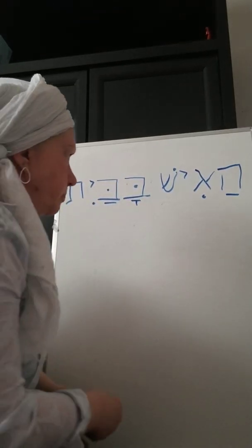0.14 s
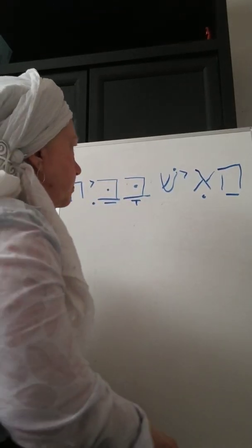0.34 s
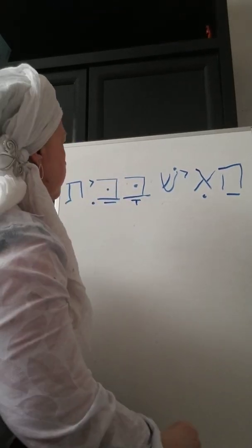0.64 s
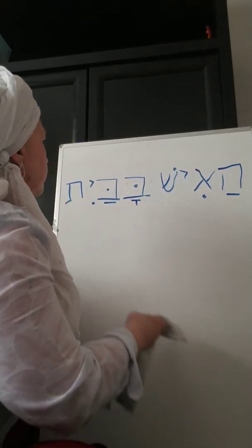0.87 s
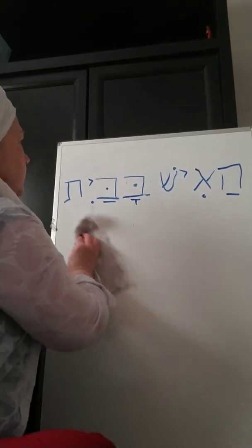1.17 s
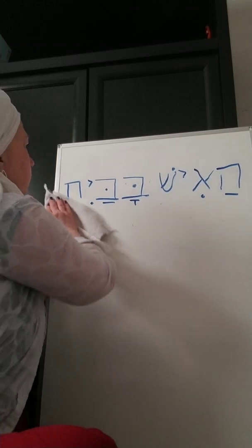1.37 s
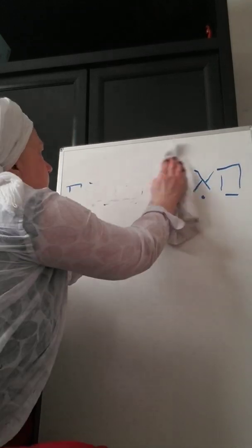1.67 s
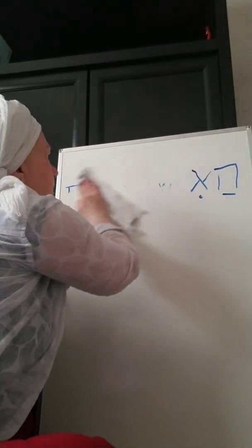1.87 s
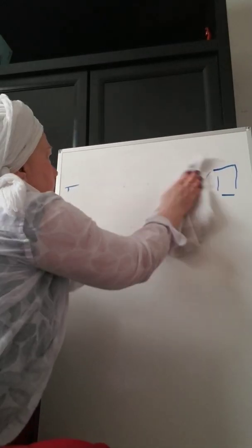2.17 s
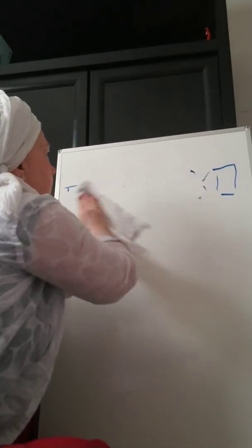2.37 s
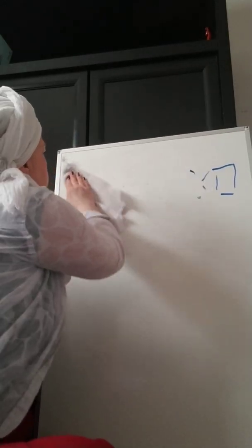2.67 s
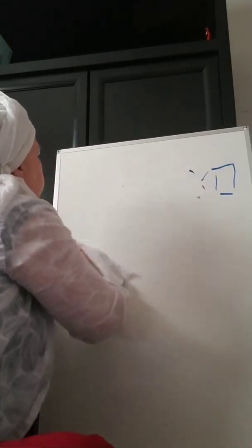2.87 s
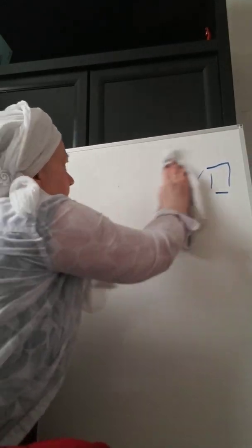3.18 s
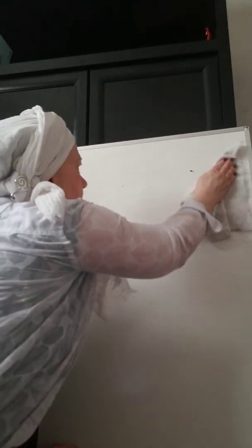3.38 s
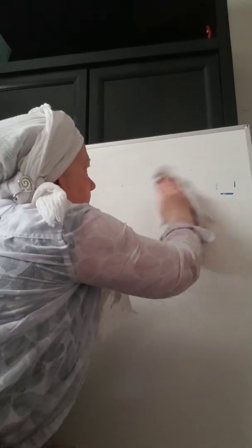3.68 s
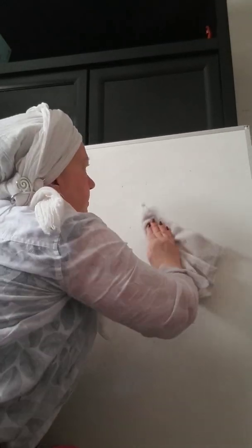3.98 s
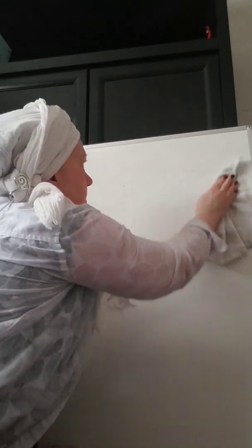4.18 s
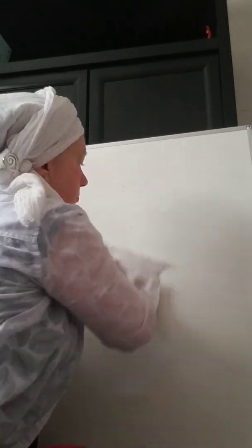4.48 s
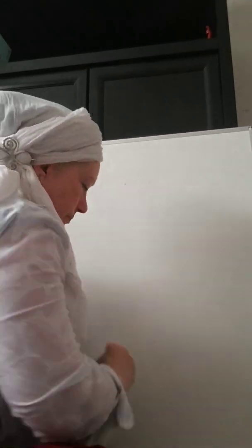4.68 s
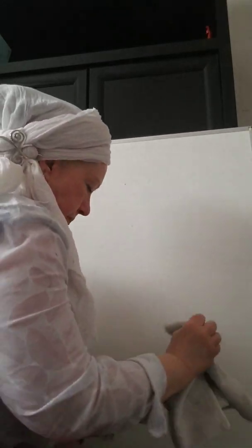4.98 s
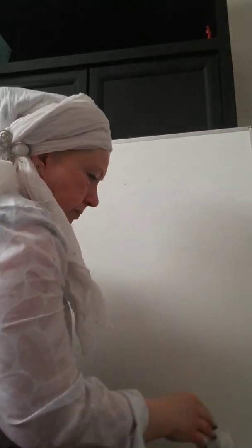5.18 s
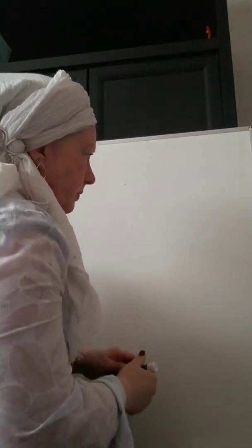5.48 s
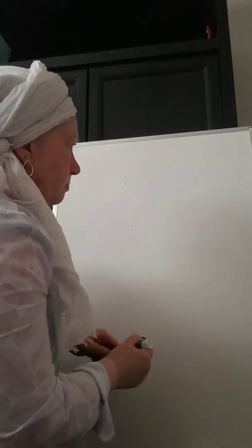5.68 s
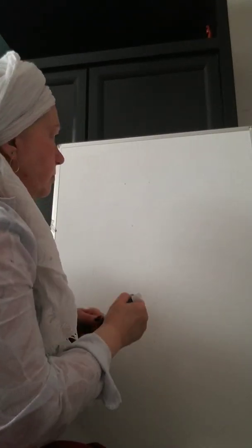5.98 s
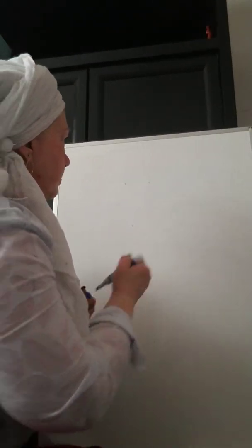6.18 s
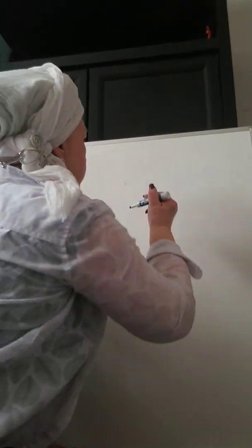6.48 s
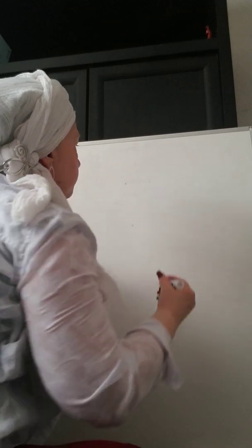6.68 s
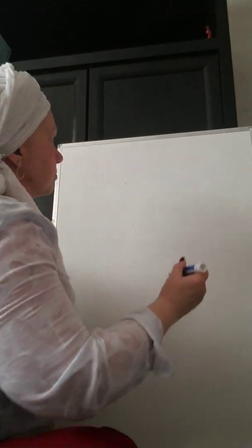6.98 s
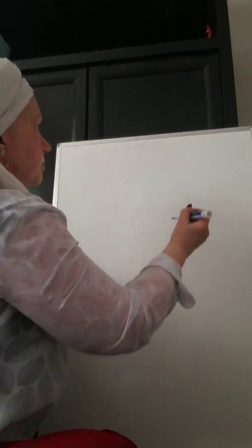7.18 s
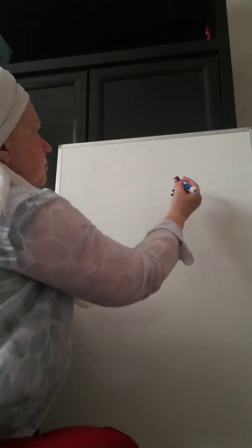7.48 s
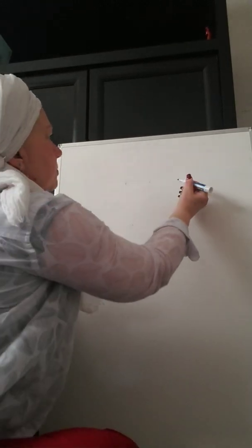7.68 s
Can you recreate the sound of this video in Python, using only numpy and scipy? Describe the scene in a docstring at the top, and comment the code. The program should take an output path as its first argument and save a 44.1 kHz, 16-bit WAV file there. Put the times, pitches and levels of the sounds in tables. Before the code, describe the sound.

In a small, quiet room, a soft thump leads into brisk, hissing cloth strokes on a whiteboard, which gives hollow knocks, thuds and rattles as it is pushed. The wiping stops a little past halfway. A marker clicks as it is picked up and uncapped, a sleeve rustles softly, and the tip makes three short strokes with light taps, over faint room rumble and hiss.

```python
"""A cloth wipes a loose whiteboard to and fro in a small room: its fibres hiss, its drag makes the panel
murmur, and the board bumps, rings and rattles against the cupboard behind it.
Then a marker is picked up and uncapped, a sleeve rustles, and the felt tip taps and slides on the board.
A low room rumble and a faint hiss lie under everything."""
import sys
import numpy as np
from scipy import signal
from scipy.fft import rfft, irfft, next_fast_len
from scipy.io import wavfile
from scipy.ndimage import map_coordinates

SR = 44100
rng = np.random.default_rng(int(sys.argv[2]) if len(sys.argv) > 2 else 0)


def transcribe(u):
    """Save the signal u as a 16-bit wav file named by the first command-line argument.

    u: samples, shape (n,) or (channels, n), limited to [-1, 1]; the rate is SR.
    q: integer samples, one column per channel.
    """
    v = np.clip(np.atleast_2d(u).T, -1, 1)
    q = np.round(v * 32767).astype(np.int16)
    wavfile.write(sys.argv[1], SR, q)


N = 346135
TOP_HZ = 15600


def amp(db):
    """Decibels to gain."""
    return 10 ** (np.asarray(db) / 20)


def unit(x):
    """Scale to rms 1."""
    return x / np.sqrt(np.mean(x ** 2) + 1e-20)


def along(points, hz):
    """Interpolate (freq_hz, value) points on a log axis."""
    freqs_hz, values = np.transpose(points)
    return np.interp(np.log(hz + 1), np.log(freqs_hz + 1), values)


def wobble(rate_hz):
    """Smooth random curve, rate_hz knots a second."""
    knots = rng.standard_normal(int(N * rate_hz / SR) + 4)
    return map_coordinates(knots, [np.arange(N) * rate_hz / SR])


def filtered(x, response):
    """Apply a frequency response."""
    n = x.shape[-1]
    padded = next_fast_len(n + 4096)
    return irfft(rfft(x, padded) * response(np.fft.rfftfreq(padded, 1 / SR)), padded)[..., :n]


def rise(t, tau_s):
    """Exponential attack."""
    return 1 - np.exp(-t / tau_s)


def fade(t, t60_s):
    """Exponential decay, 60 dB in t60_s."""
    return np.exp(-np.log(1000) * t / t60_s)


def damped(x, t60_curve):
    """Decay each frequency at its own rate."""
    hz, t, bins = signal.stft(x, SR, nperseg=256)
    decay = fade(t, along(t60_curve, hz)[:, None])
    return signal.istft(bins * decay, SR, nperseg=256)[1][:, :x.shape[1]]


def add(track, start_s, sound):
    """Mix a sound into the track."""
    part = track[:, max(round(start_s * SR), 0):][:, :sound.shape[1]]
    part += sound[:, :part.shape[1]]


def ring(modes, t, detune=0.004):
    """Damped modes; balance, tuning and phase vary from blow to blow."""
    weights = np.array([amp(db + 2 * rng.normal()) for _, db, _ in modes])
    waves = [fade(t, t60_s) * np.sin(2 * np.pi * (hz * (1 + detune * rng.normal()) * t + rng.random()))
             for hz, _, t60_s in modes]
    return np.sqrt(2) * weights @ np.array(waves) / np.linalg.norm(weights)


# Left-right likeness: freq_hz, correlation
COHERENCE = [(100, 0.9), (600, 0.73), (1200, 0.54), (2500, 0.1), (14000, 0.36)]

def noise(spectrum, size):
    """Coloured stereo noise, rms 1; the channels are most alike in the bass."""
    def colour(hz):
        angle = np.arccos(np.clip(along(COHERENCE, hz), -1, 1)) / 2
        lowpass = 1 / (1 + (hz / spectrum[-1][0] / 2) ** 4)
        highpass = 1 / (1 + (spectrum[0][0] / 2 / (hz + 1)) ** 4)
        return lowpass * highpass * amp(along(spectrum, hz)) * [np.cos(angle), np.sin(angle)]
    mid, side = filtered(rng.standard_normal((2, size)), colour)
    return unit(np.array([mid + side, mid - side]))


# Room background spectra: freq_hz, gain_db
RUMBLE = [(20, -20), (32, -8), (50, 3.5), (72, -10.5), (102, -4.5), (125, -20), (170, -26), (400, -36.5)]
HISS = [(600, -9), (1500, -12), (5000, -11), (9000, -15), (11300, -13), (12500, -6), (15800, -12)]

def room_tone():
    """Wavering low rumble and thin steady hiss."""
    rumble = unit(noise(RUMBLE, N) * amp(1.3 * wobble(5.7)))
    return amp(-57.5) * rumble + amp(-70.5) * noise(HISS, N)


# Modes of panel bending, hollow body, sheet and metal edging: pitch_hz, gain_db, t60_s
PANEL_MODES = [(45, 0.5, 0.37), (49.9, 5, 0.5), (64.7, -3.5, 0.69), (96.4, 5.5, 0.27), (105.1, 2.5, 0.26),
               (120.8, -2, 0.44), (146.7, -4, 0.57)]
HOLLOW_MODES = [(228, 0, .42), (253, 1, .42), (318, 4.5, 0.2), (354.3, -2.5, 0.42), (401.6, 7, 0.22),
                (446, -6, 0.5), (510, -4, 0.45), (606, -6, 0.47), (723, -3, 0.4), (820, -6, 0.3)]
SHEET_MODES = [(970, -2, .33), (1066, 0, .33), (1234, 1, .33), (1345, -1, .3), (1432, -3, .3),
               (1534, -7, .28), (1786, -8, .28)]
FRAME_MODES = [(6640, 5, .3), (7080, 1.5, 0.25)]
# Dense-mode spectra of body, sheet and frame: freq_hz, gain_db
KNOCK = [(140, -7), (190, -4.5), (245, -4.5), (290, -9), (360, -8.5), (480, -5), (650, -11), (850, -9),
         (1300, -18.5), (2500, -66.5)]
RATTLE = [(500, -19.5), (750, -14.5), (1300, -7), (1650, -9.5), (2100, -16.5), (2700, -16.5), (3600, -25),
          (6000, -27.5)]
CLACK = [(1500, -45), (2600, -19), (3800, 0.5), (5600, 6), (6700, 20), (8000, -2), (10000, -14),
         (15500, -15.5)]
# Board decay: freq_hz, t60_s
BOARD_T60 = [(150, 0.49), (400, 0.38), (1000, 0.36), (3000, 0.38), (12000, 0.22)]

def contact(knock_db, thud_db, rattle_db, clack_db):
    """A contact thuds and knocks; a hard one also rattles the sheet and clacks the frame."""
    t = np.arange(int(SR * 0.7)) / SR
    thud = amp(thud_db - 8.5) * ring(PANEL_MODES, t) * rise(t, 0.0022)
    body = (damped(noise(KNOCK, len(t)), BOARD_T60) + 0.95 * ring(HOLLOW_MODES, t)) * rise(t, 0.0019)
    cutoff_hz = 1500 * amp((rattle_db - knock_db) / 2)  # a soft push is too slow for the high modes
    body = filtered(body, lambda hz: 1 / (1 + 1j * hz / cutoff_hz) ** 2)
    knock = amp(knock_db - 13) * body * (1 + 0.66 * fade(t, 0.16))
    sheet_ring = np.array([ring(SHEET_MODES, t), ring(SHEET_MODES, t)])
    sheet = damped(noise(RATTLE, len(t)), BOARD_T60) + 0.6 * sheet_ring
    rattle = amp(rattle_db - 19.5) * sheet * (1 + 2.2 * fade(t, 0.1))
    frame = noise(CLACK, len(t)) + 0.76 * ring(FRAME_MODES, t)
    clack = amp(clack_db - 11) * frame * (fade(t, 0.05) + amp(-11.5) * fade(t, 0.5))  # direct + room
    return thud + knock + rattle + clack


def boom(pitch_hz):
    """The hollow behind the panel booms briefly; pitch depends on where the hand presses."""
    t = np.arange(SR // 2) / SR
    return np.tile(fade(t, 0.16) * rise(t, 0.004) * np.sin(2 * np.pi * pitch_hz * t), (2, 1))


# Cloth fetched and put down: start_s, force_db
THUMPS = [(0.353,-36.5), (0.382,-30), (5.061,-30)]
# Single bumps: start_s, force_db, hardness_db
BUMPS = [(0.985,-43.5,-5), (1.055,-44,-6.5), (1.199,-39,-12.5), (1.296,-48.5,2.5), (1.419,-25.5,-6),
         (1.762,-27.5,-20.5), (2.153,-39,-10), (2.239,-29.5,-25), (3.858,-18.5,-7), (3.993,-25,-9),
         (4.216,-32,-21), (4.384,-22,-17.5), (7.804,-47.5,2)]
# Hard shoves: start_s, force_db, hardness_db, swing_db, touch_db, landing_delay_s, boom_hz
SLAMS = [(1.494,-21,-7.5,1,3,0.014,371), (2.986,-30.5,-10.5,2.5,4,0.016,233),
         (3.391,-30,-12,2.5,-1,0.023,410), (3.91,-20.5,-2.5,5.5,3,0.014,513),
         (4.29,-19,-3,1.5,0.5,.010,391)]
# Touch, landing and rebound of a slam, relative to force: knock_db, thud_db, rattle_db, clack_db
SLAM_STAGES = [(-2, -15.5, -4.5, -11.5), (3.5, 1, 1.5, -11.5), (-4.5, 0, -6.5, -31.5)]

def thumps_and_bumps(rebound_s=0.042):
    """The cloth thumps softly when fetched and put down; the board bumps and slams on the cupboard."""
    # Vectors: knock, thud, rattle, clack
    hardness_slope, swing_slope = np.array([0, 0, 1, 1.47]), np.array([0, 1, 0, 0])
    bump_db, thump_db = np.array([3.1, 2.6, 3.8, 1]), np.array([15.5, -7.5, -42, -26])
    out = np.zeros((2, N))
    for start_s, force_db, hardness_db in BUMPS:
        add(out, start_s, contact(*(force_db + hardness_db * hardness_slope + bump_db)))
    for start_s, force_db, hardness_db, swing_db, touch_db, landing_delay_s, boom_hz in SLAMS:
        add(out, start_s + landing_delay_s, amp(force_db - 3) * boom(boom_hz))
        slam_db = force_db + hardness_db * hardness_slope + swing_db * swing_slope
        delays_s = (0, landing_delay_s, landing_delay_s + rebound_s)
        for delay_s, extra_db, stage_db in zip(delays_s, (touch_db, 0, 0), SLAM_STAGES):
            add(out, start_s + delay_s, contact(*(slam_db + extra_db + stage_db)))
    for start_s, force_db in THUMPS:
        add(out, start_s, contact(*(force_db + thump_db)))
    return out


# Spectra of contact snap, hollow barrel tick and board tap: freq_hz, gain_db
SNAP = [(1760, -25.5), (3000, -11.5), (4020, -3.5), (4910, -1.5), (6580, 2.5), (7610, -4), (9580, 2.5),
        (11200, -1), (12600, 0), (15800, -9.5)]
TICK = [(400, -13), (680, 1.5), (1050, -32), (1550, -0.5), (2000, 1), (2650, 1.5), (3600, -6), (6000, -35)]
TAP = [(70, -1), (150, -2), (350, -6), (650, -11), (1100, -17), (2000, -44)]
# Room decay: freq_hz, t60_s
ROOM_T60 = [(200, 0.3), (1500, 0.65), (6000, 0.38), (14000, 0.41)]

def click(snap_db, tick_db, tap_db, cutoff_hz=TOP_HZ):
    """A hard contact snaps and ticks; the room echoes and the board answers."""
    t = np.arange(SR // 2) / SR
    snap = amp(snap_db) * filtered(noise(SNAP, len(t)), lambda hz: 1 / (1 + (hz / cutoff_hz) ** 8))
    tick = amp(tick_db + 7) * noise(TICK, len(t))
    echo = damped(amp(-5.5) * snap + amp(-7) * tick, ROOM_T60) * rise(t, 0.0031)
    tap = amp(tap_db - 9) * damped(noise(TAP, len(t)), BOARD_T60)
    return snap * rise(t, 0.0008) * fade(t, 0.022) + tick * fade(t, 0.025) + echo + tap


# Near-wall echo decay: freq_hz, t60_s
WALL_T60 = [(500, .22), (3000, .22), (10000, .2)]

def ping(modes, level_db, echo_db):
    """A small hard part rings briefly and the nearest walls answer."""
    t = np.arange(SR // 2) / SR
    direct = amp(level_db) * ring(modes, t)
    walls = damped(rng.standard_normal((2, len(t))), WALL_T60) * rise(t, 0.0043)
    echo = signal.fftconvolve(direct[None], walls / np.linalg.norm(walls[0]), axes=1)[:, :len(t)]
    return direct + amp(echo_db) * echo


# Fingernail and marker clicks: start_s, snap_db, tick_db, tap_db, cutoff_hz
CLICKS = [(0.953,-54,-74,-53.5,14100), (1.057,-50,-61,-60,11800), (2.153,-63,-65,-45,11000),
          (4.995,-40,-58.5,-48,15100), (5.448,-52,-94,-86,9230), (6.457,-49,-77,-52,11200),
          (7.799,-37,-56.5,-43.5,10300), (7.806,-35.5,-54,-45,11200)]
# Modes of nail on board, marker pickup, cap and thin plastic wall: pitch_hz, gain_db, t60_s
NAIL_MODES = [(480, 0, .012), (950, 2, .01), (1550, 2, 0.012), (2300, -5, .005)]
PICKUP_MODES = [(640, 0, .07)]
CAP_MODES = [(420, -16, .02), (700, -13, .014), (1560, -3, .007), (2700, 3, .005), (4400, -1, .003),
             (6600, 0, .0015), (11000, 0, .002)]
PLASTIC_MODES = [(8700, -6, .004), (9700, 0, .009)]

def handling():
    """Light clicks; a nail knocks through the cloth, the marker is lifted, its cap pops and ticks."""
    out = np.zeros((2, N))
    for start_s, *settings in CLICKS:
        add(out, start_s, click(*settings))
    nail = ping(NAIL_MODES, level_db=-33.5, echo_db=-3)
    add(out, 4.139, filtered(nail, lambda hz: 1 / (1 + (hz / 3000) ** 4)))
    add(out, 4.995, ping(PICKUP_MODES, level_db=-57, echo_db=2))
    add(out, 6.120, ping(CAP_MODES, level_db=-35, echo_db=2))
    add(out, 6.210, ping(PLASTIC_MODES, level_db=-46, echo_db=-6))
    return out


def strokes(rows, swell, linger_s=0.0073, crests=None):
    """Stroke envelope: the hand speeds up to a crest and slows; the sound lingers briefly."""
    t, power = np.arange(N) / SR, np.zeros(N)
    for k, (start_s, end_s, level_db) in enumerate(rows):
        crest = 0.5 if crests is None else np.clip(crests[k], 0.1, 0.9)
        progress = np.interp(t, [start_s, start_s + crest * (end_s - start_s), end_s], [0, 0.5, 1])
        power += amp(2 * level_db) * np.abs(np.sin(np.pi * progress)) ** (2 * swell)
    pole = np.exp(-1 / (linger_s * SR))
    return np.sqrt(signal.lfilter([1 - pole], [1, -pole], power))


# Spectra of cloth fibres and dragged panel: freq_hz, gain_db
CLOTH = [(700, -38), (1500, -6), (2000, -5.5), (2800, -4.5), (4500, -4), (6200, -3.5), (7400, -2),
         (8800, -7), (10200, -3.5), (11500, -9.5), (12600, -5.5), (14000, -12.5), (15500, -9)]
DRAG = [(30, -13), (50, 5), (75, -6.5), (110, 1.5), (170, -15), (260, -18), (500, -29), (900, -35)]
# Hand sweeps, to and fro: start_s, end_s, hiss_db, drag_db, crest_fraction
SWEEPS = [(0.957,1.19,-57,-49.5,0.41), (1.177,1.395,-55,-53,0.26), (1.342,1.686,-52.5,-49,0.67),
          (1.671,1.91,-52,-42.5,0.37), (1.89,2.16,-52.5,-54,0.68), (2.152,2.404,-52.5,-50,0.34),
          (2.37,2.57,-57,-56.5,0.47), (2.556,2.821,-54.5,-62,0.63), (2.818,3.299,-52.5,-49.5,0.68),
          (3.282,3.501,-51.5,-51,0.66), (3.509,3.806,-53,-48.5,0.41), (3.739,3.933,-50,-45.5,0.76),
          (3.958,4.211,-53,-61,0.15), (4.142,4.65,-53.5,-37.5,0.26)]

def wiping():
    """Fibres hiss over the gloss, brighter when the hand is fast; their drag makes the panel murmur."""
    start_s, end_s, hiss_db, drag_db, crests = np.transpose(SWEEPS)
    hiss_env = strokes(zip(start_s, end_s, hiss_db), swell=0.83, linger_s=0.02, crests=crests)
    drag_env = strokes(zip(start_s, end_s, drag_db), swell=0.55, linger_s=0.025, crests=crests)
    fibres = noise(CLOTH, N) * amp(0.8 * wobble(57) + wobble(530))
    treble = filtered(fibres, lambda hz: hz ** 2 / (hz ** 2 + 6000 ** 2))
    hiss = hiss_env * unit(fibres + 3.43 * hiss_env / hiss_env.max() * treble)
    grip = amp(2.5 * wobble(25))  # the cloth catches and lets go
    return hiss + grip * drag_env * noise(DRAG, N)


# Sleeve slips: start_s, end_s, level_db
SLIPS = [(5.03, 5.24, -86), (6.44, 6.63, -53), (6.70, 6.87, -64.5), (7.0, 7.24, -74)]
# Sleeve spectrum: freq_hz, gain_db
FABRIC = [(71, -28), (120, 1), (280, -3), (740, -9.5), (1900, -11.5), (4000, -22), (7000, -23),
          (15000, -33)]

def sleeve():
    """Folds of fabric slip over each other as the arm rises."""
    friction = unit(noise(FABRIC, N) * amp(0.61 * wobble(150)))
    return strokes(SLIPS, swell=0.66, linger_s=0.0043) * friction


# Cuff brushes: start_s, end_s, level_db
BRUSHES = [(5.44, 5.65, -68), (6.16, 6.65, -66), (6.77, 6.88, -63), (7.05, 7.24, -67.5)]
# Cuff spectrum: freq_hz, gain_db
CUFF = [(3000, -10), (5600, -5), (9000, -7.5), (15000, -7)]

def cuff():
    """The cuff brushes the hand with a thin, uneven rustle."""
    return strokes(BRUSHES, swell=0.4) * unit(noise(CUFF, N) * amp(1.4 * wobble(120)))


# Marker strokes: start_s, length_s, touch_db, slide_db
TIP_STROKES = [(7.202, 0.048, -43.5, -52.5), (7.342, 0.197, -41.5, -65), (7.607, 0.17, -49, -56.5)]
# Tip touching and settling, relative to touch_db: delay_s, snap_db, tick_db, tap_db
TIP_STAGES = [(0, -6, -32, -15), (.008, -9, -31, -16), (.03, -9.5, -22.5, -5.5)]
# Felt friction spectrum: freq_hz, gain_db
FELT = [(2000, -10), (4200, 5.5), (6200, 7), (8500, 8), (9800, 17.5), (11200, 1), (15800, 8)]

def felt_tip():
    """The tip taps down, settles under the hand's weight and slides with a fine, uneven hiss."""
    slides = [(start_s, start_s + length_s, slide_db) for start_s, length_s, _, slide_db in TIP_STROKES]
    out = strokes(slides, swell=0.43) * unit(noise(FELT, N) * amp(1.4 * wobble(160)))
    for start_s, _, touch_db, _ in TIP_STROKES:
        for delay_s, *stage_db in TIP_STAGES:
            add(out, start_s + delay_s, click(*(touch_db + np.array(stage_db))))
    return out


def from_left(x, lead_s):
    """The sound reaches the left microphone first."""
    return filtered(x, lambda hz: np.exp(1j * np.pi * lead_s * np.outer([1, -1], hz)))


def scene():
    """All sources in the room."""
    cloth_and_board = from_left(thumps_and_bumps() + wiping(), lead_s=0.00009)
    return cloth_and_board + handling() + felt_tip() + sleeve() + cuff() + room_tone()


# Microphone balance: freq_hz, left_minus_right_db
BALANCE = [(60, 3), (330, 4), (650, -0.1), (1300, -1), (2800, 1.5), (5500, 3.5), (9000, 1), (14000, 1)]

def record(dry):
    """Two microphones of slightly different colour, with a bass roll-off and a band limit."""
    def response(hz):
        balance = amp(np.outer([1, -1], along(BALANCE, hz)) / 2)
        highpass = hz ** 4 / (hz ** 4 + 32 ** 4)
        return balance * highpass * (hz < TOP_HZ)
    return filtered(dry, response)


dry = scene()
out = record(dry)
transcribe(out)
```